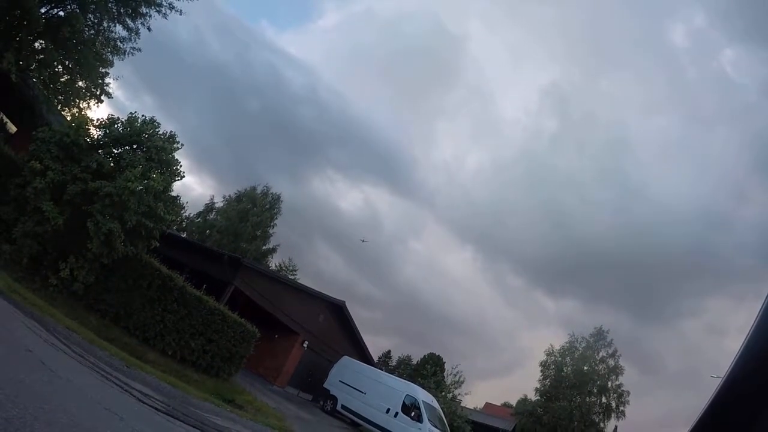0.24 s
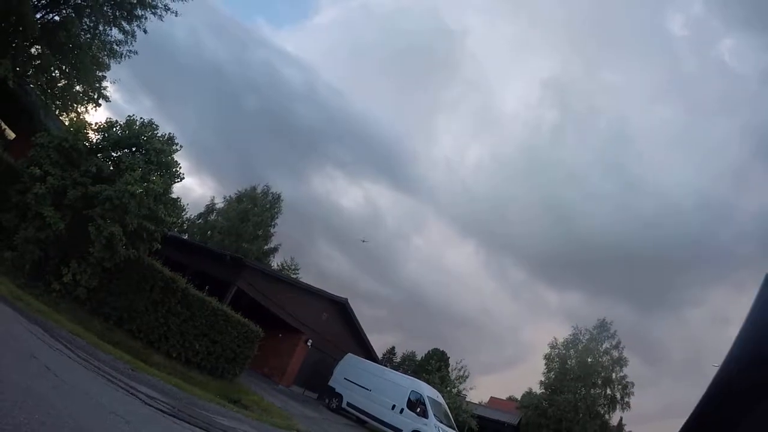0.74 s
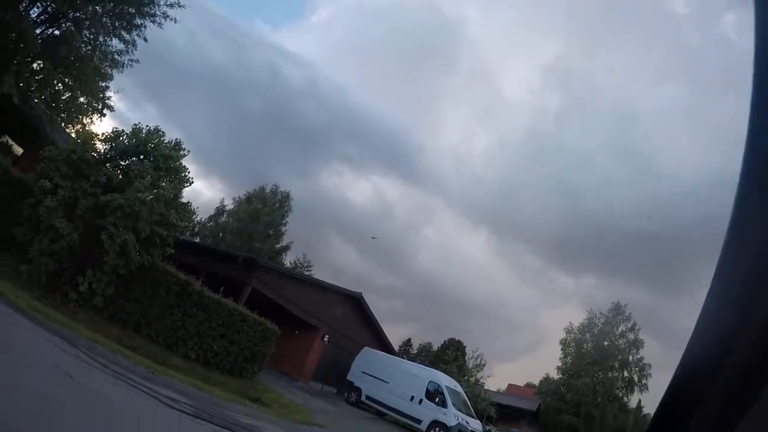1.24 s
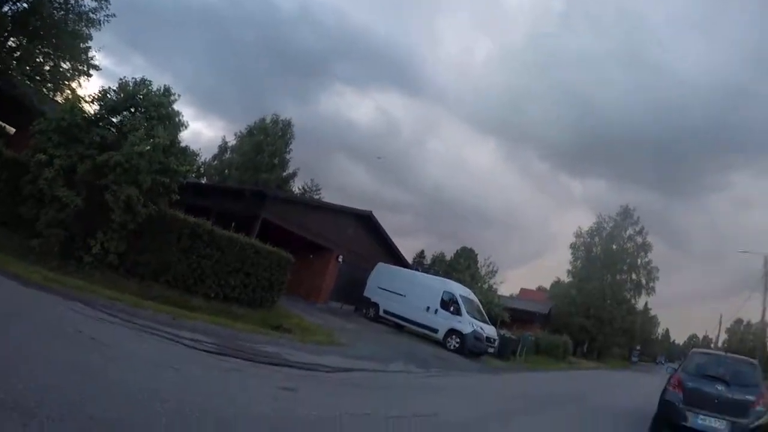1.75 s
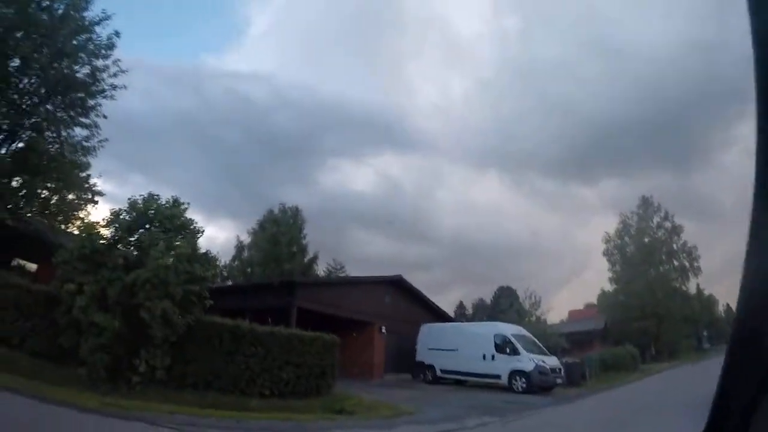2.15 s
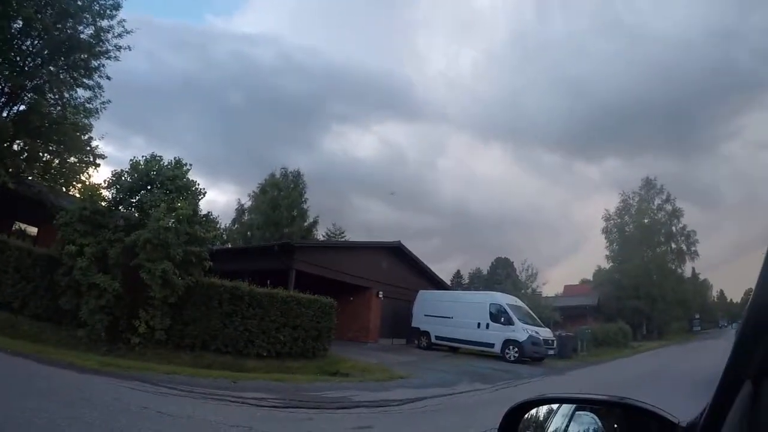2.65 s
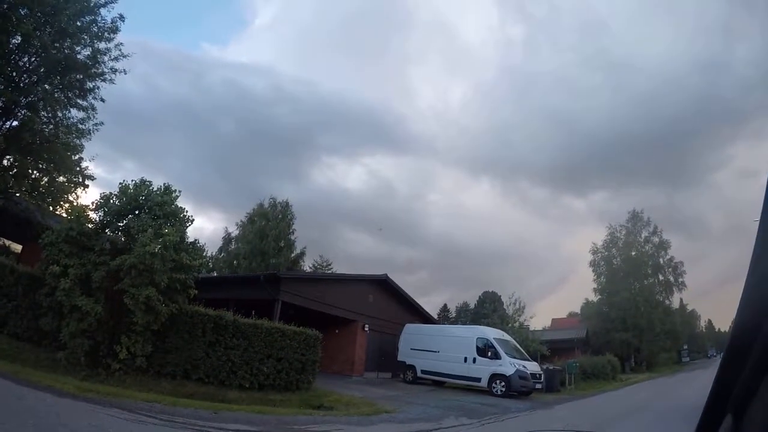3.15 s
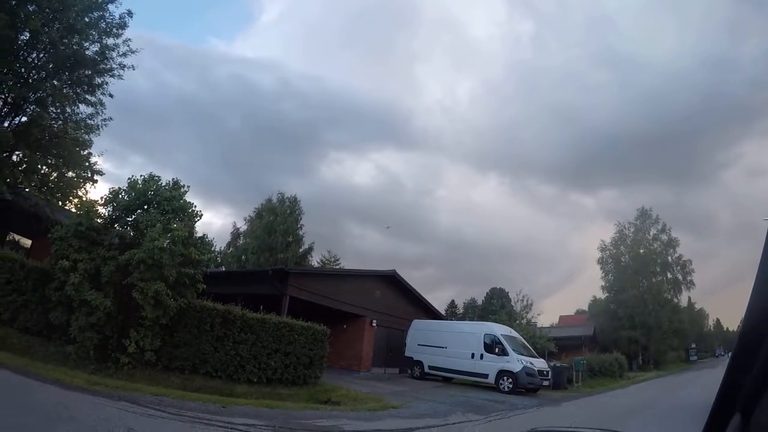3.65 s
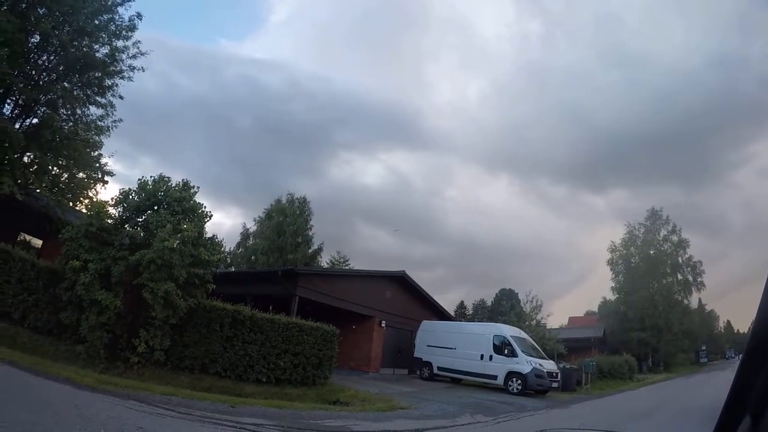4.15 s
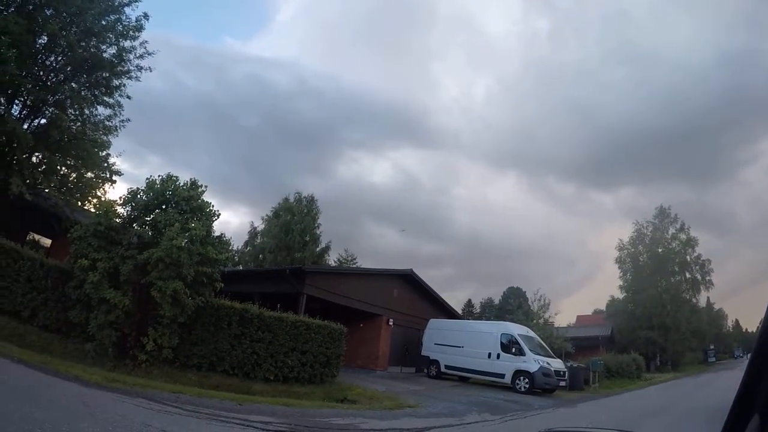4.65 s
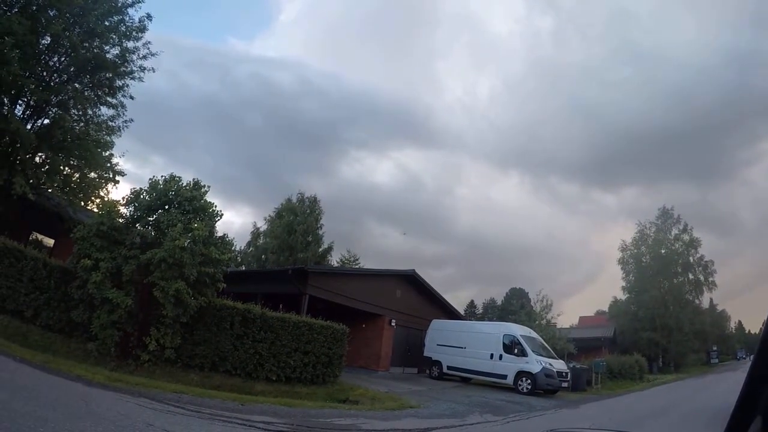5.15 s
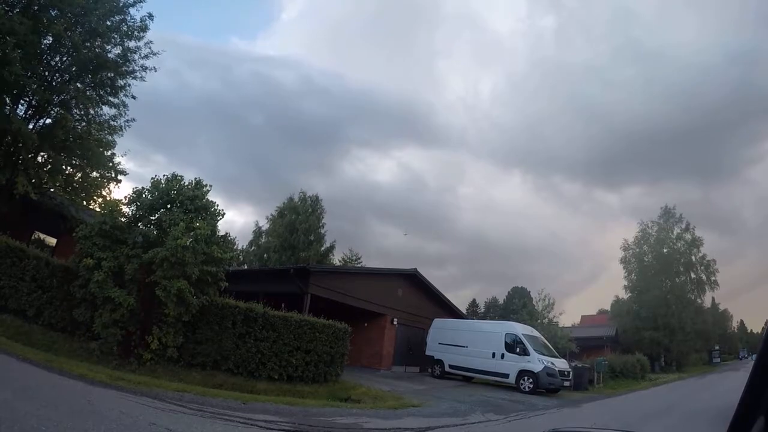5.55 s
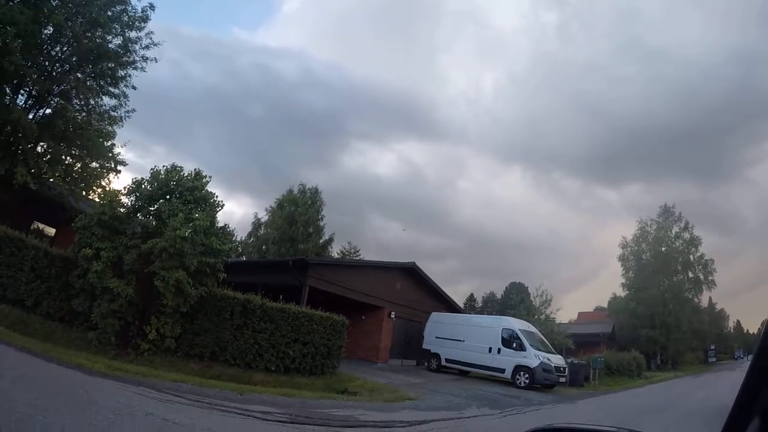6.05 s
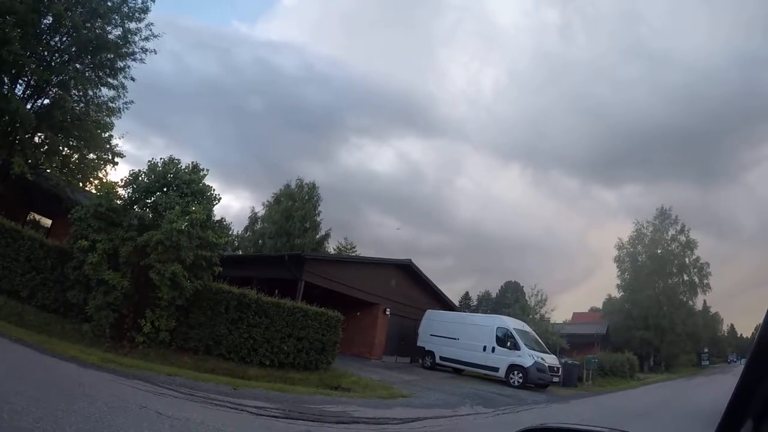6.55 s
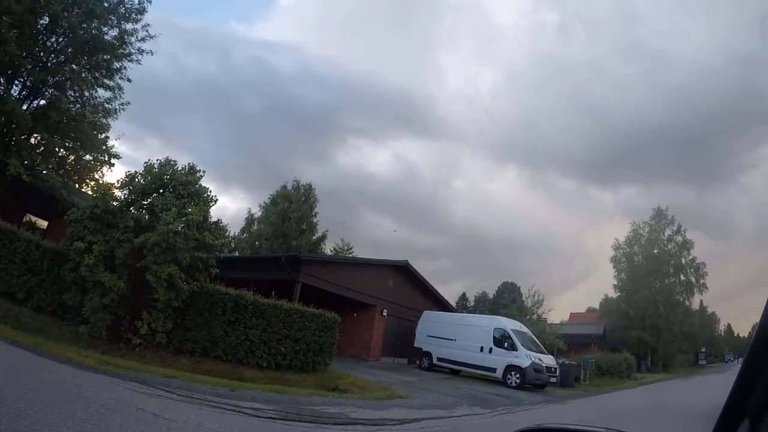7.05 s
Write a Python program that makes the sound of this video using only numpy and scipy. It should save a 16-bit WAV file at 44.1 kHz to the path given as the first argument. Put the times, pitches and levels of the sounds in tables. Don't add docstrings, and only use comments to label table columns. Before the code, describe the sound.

From 0 to about 7.3 seconds, a slowly rolling car fills its cabin with loud bass: a wavering boom around 43 hertz and rough panel rumble, throbbing in irregular bursts with brief lulls. Grinding from worn bearings enters quietly at the open window, its hollow, rippled colour sliding slowly upward; it swells around 1.5 to 2 and again from 3 to 3.7, then recedes. A thin trembling whistle near 1.6 kilohertz flares at the start, 0.8, 2.1 and 3.0, mostly left. A tiny falling creak sounds at 0.55. Fingers knock, rub and tick on the hand-held microphone from 0.8 to 2.6, with a stronger rub at 1.8 and thuds near 2.2. A barely audible squeak comes at 4.4. A knock with a crisp tick occurs at 6.3, then soft thuds at 6.9 and 7.2. Faint preamp hiss remains throughout, slightly stronger right.

```python
import sys
import numpy as np
from scipy import signal
from scipy.fft import rfft, irfft, next_fast_len
from scipy.io import wavfile
from scipy.ndimage import uniform_filter1d, minimum_filter1d

SR = 44100
rng = np.random.default_rng(int(sys.argv[2]) if len(sys.argv) > 2 else 0)


def invert_db(level):
    return 10 ** (np.asarray(level, dtype=float) / 20)


def to_wav(sig):
    pcm = np.clip(np.atleast_2d(sig), -1, 1) * 32767
    pcm = np.round(pcm).astype(np.int16)
    wavfile.write(sys.argv[1], SR, pcm.T)


N = 321706
T = np.arange(N) / SR


def rms_one(x):
    return x / np.sqrt(np.mean(x ** 2) + 1e-20)


def in_time(rows):
    s, *columns = np.transpose(rows)
    return [np.interp(T, s, c) for c in columns]


def at_hz(points, hz):
    point_hz, value = np.array(points).T
    return np.interp(np.log(np.maximum(hz, 1)), np.log(point_hz), value)


def drift(rate_hz):
    r = np.exp(-80 * np.pi * rate_hz / SR)
    chance = rng.standard_normal(N // 40 + 4002)
    slow = signal.lfilter([1], [1, -2 * r, r * r], chance)[4000:]
    return np.interp(np.arange(N) / 40, np.arange(len(slow)), rms_one(slow))


def sine(hz):
    return np.sin(2 * np.pi * np.cumsum(hz) / SR)


def coloured(spectrum, alike):
    size = next_fast_len(N)
    hz = np.fft.rfftfreq(size, 1 / SR)
    mid, side = rfft(rng.standard_normal((2, size)))
    likeness = np.clip(at_hz(alike, hz), -1, 1)
    pair = np.sqrt(1 + likeness) * mid + np.sqrt(1 - likeness) * side * np.array([[1], [-1]])
    return rms_one(irfft(pair * invert_db(at_hz(spectrum, hz)), size)[:, :N])


def cut(x, hz, kind, order=4):
    return signal.sosfilt(signal.butter(order, hz, kind, fs=SR, output="sos"), x)


def ring(clicks, hz, t60):
    r, w = invert_db(-60 / (t60 * SR)), 2 * np.pi * hz / SR
    return signal.lfilter([0, np.sin(w)], [1, -2 * r * np.cos(w), r * r], clicks + 1e-18)


def steadied(x, smooth_s, share):
    power = uniform_filter1d(np.mean(x ** 2, axis=0), int(smooth_s * SR))
    return rms_one(x / (power + .02 * power.mean()) ** (share / 2))


def swells(rows, rest_db, edge):
    power = np.full(N, invert_db(rest_db) ** 2)
    for s, level_db, length, *_ in rows:
        near = slice(max(0, int((s - 3 * length) * SR)), int((s + 3 * length) * SR))
        fall_db = 4 * np.abs(2 * (T[near] - s) / length) ** edge
        power[near] += invert_db(level_db - fall_db) ** 2
    return np.sqrt(power)


def dips(rows, half_s):
    coarse = T[::64]
    drop_db = sum(depth_db * np.exp(-((coarse - s) / half_s) ** 2) for s, depth_db in rows)
    return invert_db(-np.interp(T, coarse, drop_db))


# (frequency [Hz], density [dB per Hz])
HISS_COLOUR = [(2000, -7.5), (3500, -2.5), (5000, -1), (6200, 1.5), (7200, 1), (8000, -0.5), (9800, 0),
               (11500, -6.5), (13500, -13.5), (16000, -28)]
HISS_DB = -62.5


def preamp_hiss():
    noise = coloured(HISS_COLOUR, [(3000, 0.048), (12000, 0.043)])
    return invert_db(HISS_DB + 1.66) * noise * invert_db([[-1.5], [1.5]])


# (centre [s], level [dB], length [s])
CREAK = [
    (.545, -41, .07),
]
CREAK_HZ, CREAK_FALL_HZ_PER_S = 1146, 4900


def creak():
    hz = CREAK_HZ - CREAK_FALL_HZ_PER_S * np.clip(T - CREAK[0][0], -.1, .1)
    return swells(CREAK, -120, edge=4.0) * sine(hz) * [[.2], [1]]


# (centre [s], level [dB], length [s])
SQUEAK = [
    (4.39, -60.5, 0.075),
]
SQUEAK_HZ, SQUEAK_RISE_HZ_PER_S = 477, 350


def squeak():
    hz = SQUEAK_HZ + SQUEAK_RISE_HZ_PER_S * np.clip(T - SQUEAK[0][0], -.06, .035)
    phase = 2 * np.pi * np.cumsum(hz + 2.5 * drift(40)) / SR
    stack = 0
    for k in range(8):
        flicker = invert_db(-2.0 * k + (1.5 + 1.0 * k) * drift(35))
        stack = stack + flicker * np.sin((k + 7) * phase)
    return swells(SQUEAK, -120, edge=2.53) * stack


# (centre [s], level [dB], length [s])
RUBS = [(.79, -53.5, 0.019), (.87, -62, 0.16), (.978, -55, .02), (1.07, -62.5, 0.19), (1.135, -63.5, 0.036),
        (1.195, -66, .025), (1.52, -57, 0.23), (1.68, -53, 0.064), (1.742, -47.5, 0.05),
        (1.827, -34.5, 0.033), (1.91, -58.5, .11), (2.05, -63.5, 0.2), (2.28, -54.5, .022),
        (2.35, -55.5, 0.052), (2.47, -60.5, 0.11), (2.55, -62.5, .08), (3.0, -62.5, 0.015),
        (3.05, -66, 0.032)]
# (frequency [Hz], density [dB per Hz])
RUB_COLOUR = [(150, 6), (600, 5), (920, 16), (1300, 6), (1800, 8), (2300, 2), (3000, -8), (4000, -3),
              (5000, -4), (6000, 0), (7500, -10), (8200, -17), (10000, -13), (14000, -30)]
# (frequency [Hz], likeness [-1 to 1])
RUB_ALIKE = [(200, -.5), (950, -.95), (1500, .3), (2200, .5), (6000, .45), (12000, .6)]
SKIN_DB, FLEX_DB = 11, 11.5
# (time [s], thud level [dB], thud pitch [Hz], share at the right port [ratio])
KNOCKS = [(.772, -12, 170, 0), (.885, -19, 130, 0), (.955, -19, 260, 0), (.98, -24, 300, 0),
          (1.19, -28, 250, 0), (1.375, -17, 200, 0), (1.46, -20, 110, 0), (1.538, -19, 220, 0),
          (1.615, -23, 280, 0), (1.68, -20, 280, 0), (1.803, -17, 120, -.6), (1.845, -15, 170, -.6),
          (1.89, -21, 150, 0), (2.04, -20, 230, 0), (2.159, -10, 220, .4), (2.252, -13, 75, -.8),
          (2.253, -19, 280, -.9), (2.254, -30, 800, -1.8), (2.365, -19, 250, 0), (2.545, -27, 250, 0),
          (6.279, -15, 70, -.8), (6.28, -24, 260, -.8), (6.915, -20, 130, 0), (7.19, -24, 120, 0),
          (7.24, -16, 190, 0)]
# (time [s], level [dB])
TICKS = [(.12, -45.5), (0.773, -43.5), (0.884, -53), (2.251, -51.5), (2.366, -48.5), (6.24, -50),
         (6.279, -33.5), (6.32, -47)]
# (frequency [Hz], level [dB], t60 [s])
CASE_MODES = [(1630, 8.5, .015), (2240, -2, 0.047), (1000, 5.5, 0.0074), (3250, -6, .006), (6040, 1, 0.011)]


def fingers():
    skin = coloured(RUB_COLOUR, RUB_ALIKE)
    flex = rms_one(cut(rng.standard_normal(N), [250, 1150], "band", order=2)) * [[1], [-1]]
    grain = invert_db(1.3 * drift(90) + 0.5 * drift(25))
    out = swells(RUBS, -120, edge=2.5) * grain * (invert_db(SKIN_DB) * skin + invert_db(FLEX_DB) * flex)

    click, age = np.eye(1, 4096)[0], np.arange(4096) / SR
    for s, thud_db, thud_hz, right in KNOCKS:
        at = round(s * SR)
        thud = -invert_db(thud_db + 7) * ring(click, thud_hz, 3.5 / thud_hz)
        thud = cut(thud, 3 * thud_hz, "low", order=1) * [[1], [right]]
        out[:, at:at + click.size] += thud[:, :N - at]

    scratch = age / 0.0021 * np.exp(1 - age / 0.0013)
    modes = sum(invert_db(db) * ring(click, hz, t60) for hz, db, t60 in CASE_MODES)
    modes = cut(modes, 8000, "low") * [[1], [.4]]
    for s, tick_db in TICKS:
        at = round(s * SR)
        span = slice(at, at + click.size)
        out[:, span] += invert_db(tick_db - 3.0) * modes + invert_db(tick_db + 7.5) * scratch * skin[:, span]
    return out


# (centre [s], level [dB], length [s], pitch [Hz])
FLARES = [(0, -49.5, 0.22, 1640), (.35, -57, .4, 1632), (.82, -47, .3, 1630), (2.07, -43, 0.11, 1660),
          (3.0, -44.5, .2, 1630), (3.35, -51, 0.77, 1616), (5.3, -55, 1, 1645)]
WHISTLE_REST_DB = -62


def whistle():
    hz = in_time(FLARES)[2] + 9 * drift(20)
    flare = swells(FLARES, WHISTLE_REST_DB, edge=1.3) * invert_db(4.5 * drift(41))
    return flare * sine(hz) * [[1.15], [.4]]


# (time [s], level [dB], brightness above the usual tilt [dB])
ROAR = [(0.0, -37, 3.5), (0.32, -42, 2), (0.75, -43, 2.5), (1.26, -41, 0), (1.5, -34, -5),
        (1.62, -37, -4.5), (1.91, -37, -3), (2.5, -40.5, -1.5), (2.76, -43, -0.5), (3.06, -35, 2),
        (3.2, -37, 2), (3.45, -36, -2), (3.7, -37, -2.5), (4.12, -42.5, -1), (4.67, -43, 0),
        (5.15, -40, -0.5), (5.97, -45.5, 1), (7.29, -43.5, -3.5)]
# (frequency [Hz], density [dB per Hz])
ROAR_COLOUR = [(200, -30.5), (335, -6), (440, 1.5), (520, 0), (660, -2.5), (1150, -7.5), (1800, -15),
               (2300, -19), (3400, -23), (4200, -32.5), (6500, -58)]
# (frequency [Hz], likeness [-1 to 1])
ROAR_ALIKE = [(300, 0.61), (600, 0.75), (1200, 0.39), (2500, 0.52), (5000, 0.42)]
ROAR_PAN_DB = -.8
ECHO_START_MS, ECHO_SHRINK_MS_PER_S = 3.315, 0.1
TURN_S, TURN_LENGTH_S, TURN_SHRINK_MS = 2.12, 0.22, 0.21
BOUNCE_SHARE, BOUNCE_FADE_DB_PER_S = .75, .55


def roar():
    level_db, bright_db = in_time(ROAR)
    noise = coloured(ROAR_COLOUR, ROAR_ALIKE)
    dull = invert_db(0.5 * drift(4.2)) * rms_one(cut(noise, 1600, "low"))
    bright = invert_db(bright_db - 10.5 + 0.27 * drift(6.6)) * rms_one(cut(noise, 1386, "high"))
    direct = invert_db(level_db) * (dull + bright)

    turned = np.clip((T - TURN_S) / TURN_LENGTH_S + .5, 0, 1)
    delay_ms = ECHO_START_MS - ECHO_SHRINK_MS_PER_S * T - TURN_SHRINK_MS * turned
    samples = np.arange(N)
    late = np.interp(samples - delay_ms * SR / 1000, samples, direct.mean(axis=0))
    bounce_gain = BOUNCE_SHARE * invert_db(1.5 * drift(.8) - BOUNCE_FADE_DB_PER_S * T)
    bounce = bounce_gain * cut(late, 2000, "low", order=1)
    return (direct + bounce) * invert_db(ROAR_PAN_DB * np.array([[.5], [-.5]]))


# (frequency [Hz], density [dB per Hz])
PANELS = [(9.4, -42.5), (16, -25.5), (26, -4), (38, 11), (54, -2), (70, -8.5), (88, -6.5), (102, -5),
          (141, -17), (177, -17), (194, -20), (212, -31), (253, -25.5), (319, -38), (340, -59.5),
          (440, -65.5), (750, -120)]
# (centre [s], level [dB], length [s])
PATCHES = [(0.22, -24, 0.084), (0.57, -16, 0.14), (0.84, -16, 0.3), (1.53, -15, 0.06), (1.66, -18, 0.18),
           (1.86, -17, 0.053), (2.04, -11, 0.085), (2.32, -15.5, 0.23), (2.52, -17, 0.07),
           (2.61, -15.5, 0.23), (2.7, -15.5, 0.18), (2.92, -14, 0.11), (3.08, -20, 0.47), (3.58, -13, 0.12),
           (3.72, -15, 0.33), (3.87, -17, 0.08), (4.0, -18.5, 0.38), (4.3, -16.5, 0.33), (4.6, -16, 0.074),
           (4.8, -19, 0.067), (5.0, -14, 0.07), (5.33, -13, 0.099), (5.58, -22, 0.22), (5.68, -25, 0.16),
           (5.94, -19.5, 0.39), (6.26, -18.5, 0.09), (6.51, -9.5, 0.041), (6.69, -19.5, 0.22),
           (6.85, -8, 0.053), (7.04, -17.5, 0.16)]
# (centre [s], depth [dB])
SMOOTH = [(.33, 10), (.73, 3), (1.11, 7), (1.76, 3.5), (1.93, 4.5), (2.46, 7), (2.56, 5), (2.82, 5.5),
          (3.83, 3.5), (4.55, 4.5), (4.92, 8), (5.26, 6), (5.4, 5.5), (6.45, 3), (6.56, 6.5), (6.8, 3),
          (6.91, 3), (7.16, 2.5)]
SMOOTH_ROAD_DB, SMOOTH_S = -16, 0.026
UPPER_DB, UPPER_SAG_DB_PER_S = -29, 0.5
UPPER_FOLLOWS_PATCH, UPPER_FOLLOWS_GRIND = 0.3, 0.5


def rumble():
    rough = swells(PATCHES, SMOOTH_ROAD_DB, edge=2.9) * dips(SMOOTH, SMOOTH_S)
    grind_db = in_time(ROAR)[0]
    upper_db = UPPER_DB - UPPER_SAG_DB_PER_S * (T - T.mean())
    upper_db = upper_db + UPPER_FOLLOWS_GRIND * (grind_db - grind_db.mean())
    upper_gain = invert_db(upper_db) * rms_one(rough) ** UPPER_FOLLOWS_PATCH

    shake = coloured(PANELS, [(20, .999), (120, .997), (200, .99), (300, .95)])
    sub = invert_db(-23) * rms_one(cut(shake, 27.5, "low", order=6))
    edges = invert_db(-27.0) * rms_one(cut(shake, [28, 58], "band"))
    low = steadied(cut(shake, [56, 137], "band"), smooth_s=0.051, share=0.58)
    upper = steadied(cut(shake, [137, 330], "band"), smooth_s=0.057, share=0.063)
    return sub + edges + invert_db(-2.5) * rough * low + upper_gain * upper


# (centre [s], level [dB], length [s], pitch [Hz])
SURGES = [(0.14, -11, 0.074, 42.98), (0.24, -18, 0.052, 44.5), (0.38, -10, 0.078, 41.7),
          (0.7, -10.5, 0.14, 43.05), (0.97, -14, 0.11, 42.26), (1.2, -10.5, 0.1, 42.4),
          (1.53, -12.5, 0.26, 40.55), (1.78, -9.5, 0.08, 42.8), (1.95, -23, 0.12, 44.15),
          (2.15, -17, 0.15, 46.2), (2.31, -22.5, 0.11, 45.33), (2.44, -15, 0.057, 44.0),
          (2.65, -20, 0.054, 40.52), (2.8, -31, 0.074, 44.88), (3.14, -13.5, 0.11, 43.55),
          (3.45, -12.5, 0.082, 41.37), (3.66, -18.5, 0.096, 41.12), (3.78, -12.5, 0.11, 44.52),
          (4.2, -20.5, 0.12, 37.87), (4.46, -19.5, 0.26, 47.15), (4.9, -10.5, 0.14, 41.85),
          (5.5, -16, 0.21, 44.9), (5.89, -18, 0.077, 44.67), (6.1, -15.5, 0.16, 45.06),
          (6.39, -9, 0.15, 43.9), (6.67, -22, 0.079, 43.36), (6.8, -25, 0.12, 49.9),
          (6.98, -28, 0.11, 42.83), (7.13, -33.5, 0.08, 44.54), (7.24, -16, 0.23, 42.6)]
# (centre [s], depth [dB])
LULLS = [(.08, -4), (.2, 8), (.3, 10), (.63, 6), (.8, 3), (1.09, 6), (1.39, 8), (1.71, 8), (2.05, 20),
         (2.37, 9.5), (2.57, 8), (2.75, 9), (2.86, 10), (3.22, 3), (3.51, 1), (4.1, 6), (4.31, 9),
         (4.62, 3), (5.31, 15), (5.65, 12), (5.8, 10), (5.95, 5), (6.27, 3), (6.6, 3), (6.9, 12), (7.07, 4),
         (7.19, 9)]
LULL_S = 0.032
CALM_BOOM_DB, BOOM_SAG_DB_PER_S = -15, 0.37


def boom():
    hz = in_time(SURGES)[2] + 2.98 * drift(6.26)
    swing = swells(SURGES, CALM_BOOM_DB, edge=1.8) * dips(LULLS, LULL_S)
    unrest = invert_db(-2.0 + 0.9 * drift(7.8) - BOOM_SAG_DB_PER_S * T)
    return np.sqrt(2) * swing * unrest * sine(hz)


def scene():
    bass = (boom() + rumble()) * invert_db([[-.8], [.8]])
    return creak() + squeak() + fingers() + whistle() + roar() + bass


def roll_off(x):
    return signal.sosfilt(signal.butter(12, 15700, fs=SR, output="sos"), x)


def record(dry):
    peak_db = 20 * np.log10(np.abs(dry).max(axis=0) + 1e-9)
    over_db = np.maximum(peak_db + 5.66, 0)
    release = 150 * T
    held = np.maximum.accumulate(over_db + release) - release
    ahead = -minimum_filter1d(-over_db, size=200)
    held = uniform_filter1d(np.maximum(held, ahead), size=200)
    return roll_off(dry * invert_db(-.9 * held) + preamp_hiss())


dry = scene()
out = record(dry)
to_wav(out)
```